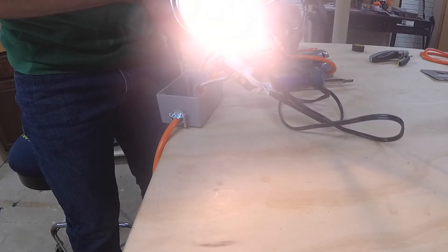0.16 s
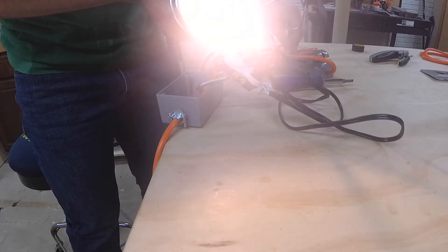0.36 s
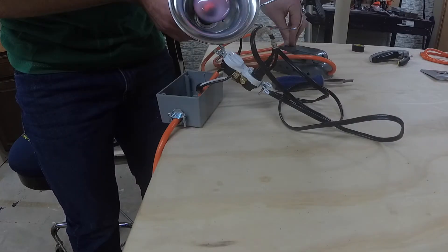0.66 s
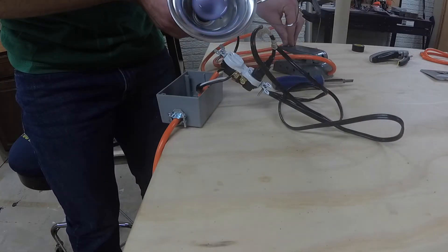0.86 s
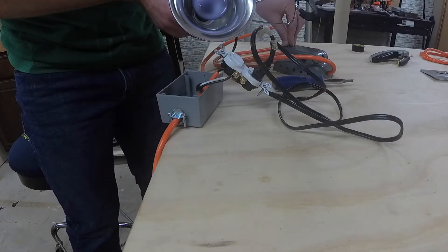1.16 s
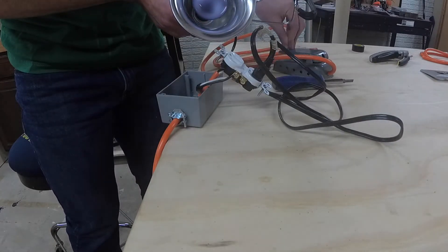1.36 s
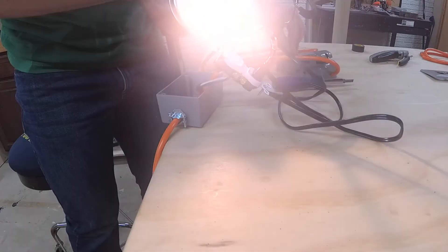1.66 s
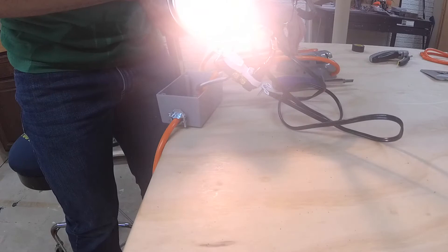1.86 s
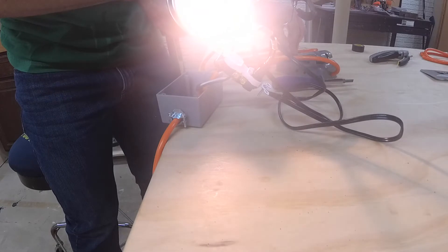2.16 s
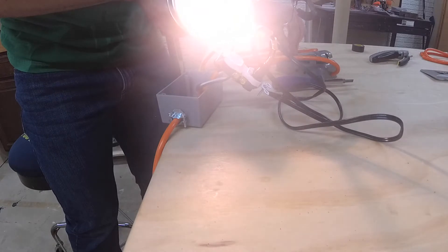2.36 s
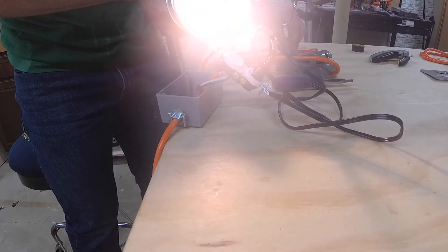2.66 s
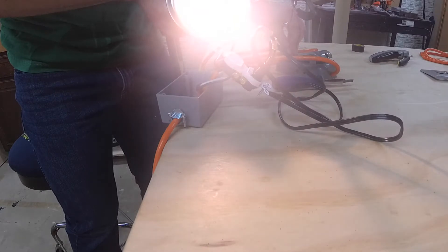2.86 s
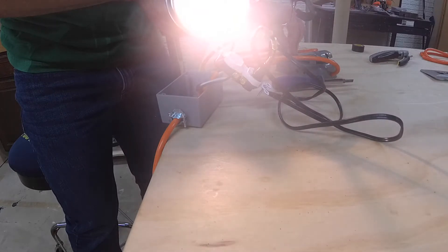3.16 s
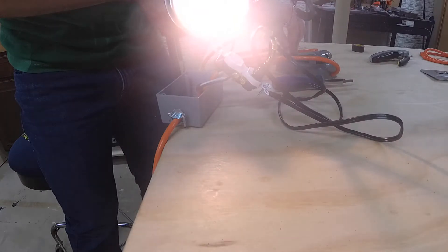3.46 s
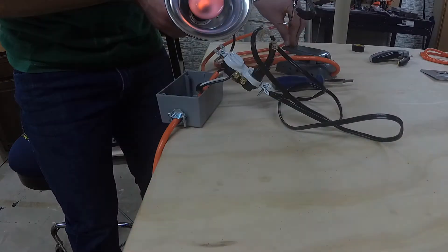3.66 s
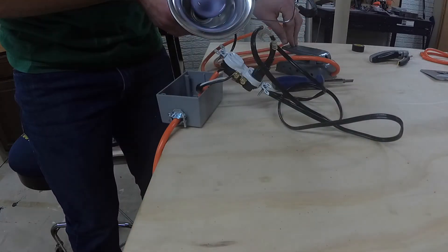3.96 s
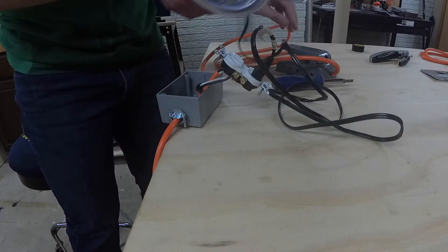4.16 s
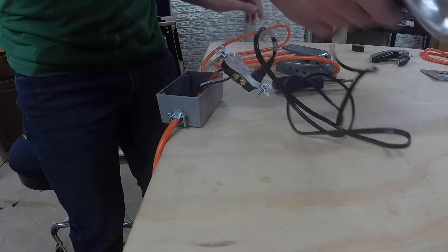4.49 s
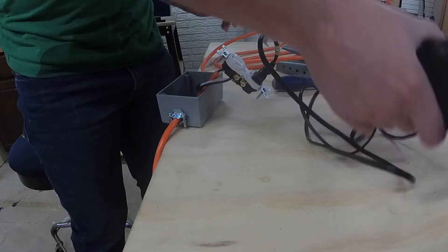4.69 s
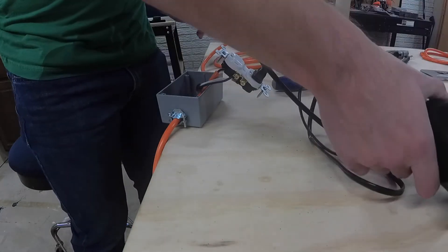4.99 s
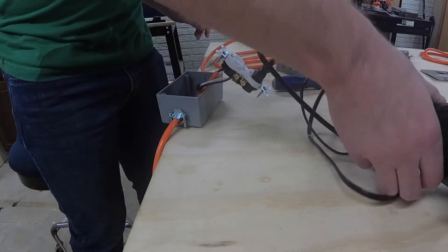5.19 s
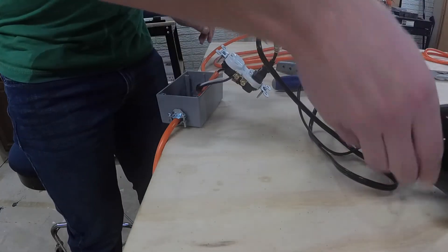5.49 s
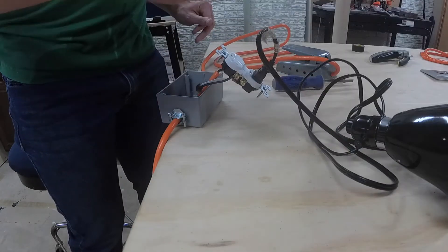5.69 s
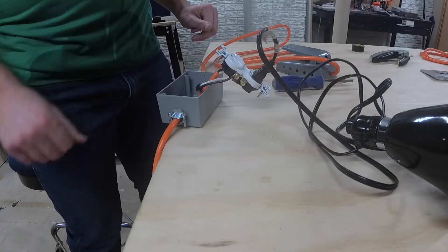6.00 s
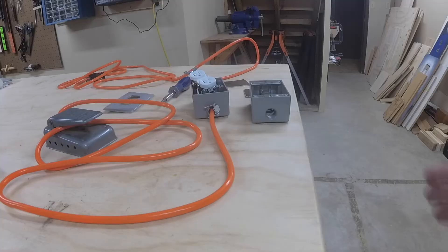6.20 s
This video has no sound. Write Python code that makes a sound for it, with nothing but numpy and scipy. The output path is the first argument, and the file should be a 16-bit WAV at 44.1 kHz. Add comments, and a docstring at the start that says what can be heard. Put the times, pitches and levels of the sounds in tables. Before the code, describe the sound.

Springy clicks and one sharp bang from a steel pedal, followed by a dragged cord and a metal lamp clattering onto plywood.

```python
"""Far-off machines hum in a workshop throughout. At 0.5 s a steel foot switch is released: its hinge
spring slips in small, clicking steps. It is pressed, and at 1.5 s the pedal bangs on its stop; at 3.5 s
it is released again. From 4 s a clamp lamp is unplugged and its cord dragged over a plywood bench.
Around 5 s the lamp is put down and bounces, and the cord rubs on softly to the end."""
import sys
import numpy as np
from scipy import signal
from scipy.fft import rfft, irfft, next_fast_len
from scipy.io import wavfile
from scipy.ndimage import map_coordinates

SR = 44100
rng = np.random.default_rng(int(sys.argv[2]) if len(sys.argv) > 2 else 0)


def file_out(sig):
    """Save sig as 16-bit WAV at sys.argv[1]."""
    # one column per channel
    cols = np.atleast_2d(sig).T
    # limit, then scale
    lim = np.clip(cols, -1, 1)
    pcm = np.round(lim * 32767).astype(np.int16)
    wavfile.write(sys.argv[1], SR, pcm)


N = 279594
SCENE_T = np.arange(N) / SR
HIT_T = np.arange(16000) / SR  # seconds since the start of one hit


def amp(db):
    """Turns decibels into a number to multiply by."""
    return 10 ** (np.asarray(db) / 20)


def unit(x):
    """Scales a sound to an average strength (rms) of 1."""
    return x / np.sqrt(np.mean(x ** 2) + 1e-20)


def along(points, hz):
    """Reads a curve of (f/Hz, value) points at hz, with octaves evenly spaced."""
    freqs, values = np.transpose(points)
    return np.interp(np.log(hz + 1), np.log(freqs + 1), values)


def wobble(rate):
    """A smooth curve through `rate` random values a second."""
    return map_coordinates(rng.standard_normal(int(N * rate / SR) + 4), [SCENE_T * rate])


def filtered(x, response):
    """Multiplies each frequency in x by response(hz)."""
    size = next_fast_len(x.shape[-1] + 4096)
    hz = np.fft.rfftfreq(size, 1 / SR)
    return irfft(rfft(x, size) * response(hz), size)[..., :x.shape[-1]]


def stereo(pair, spectrum, likeness):
    """Shapes two noises and blends them into left and right: likeness 1 is the same, 0 unrelated."""
    def blend(hz):
        angle = np.arccos(np.clip(along(likeness, hz), -1, 1)) / 2
        return amp(along(spectrum, hz)) * [np.cos(angle), np.sin(angle)]
    mid, side = filtered(pair, blend)
    return np.array([mid + side, mid - side])


def ring(tones, rise_s, rough, ring_share=1):
    """A struck body rings at its own tones, each falling 60 dB in its ring time x ring_share; peak 1."""
    hz, db, ring_s = np.transpose(tones)[..., None]
    level = amp(db + 2.5 * rng.standard_normal(hz.shape))  # no two blows are alike
    t = HIT_T[:int(ring_s.max() * ring_share * SR)]
    # small random steps in phase make the tones less pure
    steps = rng.standard_normal((len(hz), len(HIT_T) // 16)) * np.sqrt(rough * hz * 16 / SR)
    wander = np.repeat(np.cumsum(steps, axis=1), 16, axis=1)[:, :len(t)]
    phase = 2 * np.pi * (hz * t + rng.random(hz.shape)) + wander
    fade = amp(-60 * t / (ring_s * ring_share))
    sound = np.sum(level * fade * np.sin(phase), axis=0) * (1 - np.exp(-t / rise_s))
    return np.pad(sound, (0, len(HIT_T) - len(t))) / np.abs(sound).max()


def burst(spectrum, fade_s, rise_s=0.0013):
    """A puff of noise, shaped by (f/Hz, level/dB) points, that falls 60 dB in fade_s; peak 1."""
    noise = filtered(rng.standard_normal(len(HIT_T)), lambda hz: amp(along(spectrum, hz)))
    puff = noise * amp(-60 * HIT_T / fade_s) * (1 - np.exp(-HIT_T / rise_s))
    return puff / np.abs(puff).max()


# The tone colour of the room's air noise: f/Hz, relative level/dB
AIR_COLOUR = [(25, -18.5), (60, -6), (90, -12.5), (120, -7.5), (160, -7.5), (260, -0.5), (330, -7.5),
              (370, -0.5), (410, -11.5), (480, -5), (580, -12), (740, -12.5), (900, -12.5), (1300, -17.5),
              (3000, -19), (8000, -18.5), (15500, -16)]
# How alike that noise is on the left and right: f/Hz, likeness
AIR_LIKENESS = [(60, 0.72), (130, 0.96), (290, 0.98), (640, 0.81), (1410, 0.42), (3100, 0.076),
                (6820, -0.073), (15000, -0.39)]
# The tones of far-off motors: f/Hz, level/dB
MOTOR_TONES = [(60, -65), (120.5, -66), (240, -65), (300, -61.5), (372, -77), (480, -68), (625, -70),
               (660, -71), (732, -69), (802, -84), (1090, -77.5)]

def workshop():
    """Air rushes softly and distant motors hum; the higher tones waver more in pitch."""
    air_level = amp(-51.5 + 0.66 * wobble(9))
    air = air_level * unit(stereo(rng.standard_normal((2, N)), AIR_COLOUR, AIR_LIKENESS))
    hum = np.zeros(N)
    for hz, db in MOTOR_TONES:
        level = amp(db + 3.1 * wobble(7.5))
        hum += level * np.sin(2 * np.pi * hz * SCENE_T + 0.0048 * hz * wobble(11))
    return air + hum


# How long the room's echo takes to fall 60 dB: f/Hz, fade time/s
ECHO_FADE = [(150, 0.6), (500, 0.44), (1500, 0.38), (4000, .3), (8000, 0.25), (15000, 0.18)]
# How alike the echo is on the left and right: f/Hz, likeness
ECHO_LIKENESS = [(60, 0.99), (300, 1), (1000, 0.96), (3000, 0.98), (4500, 0.59), (8000, 0.1), (15000, .2)]

def add_hit(out, start_s, hit, echo_db, pan_db):
    """Adds a hit and its echo from the walls to out; a pan below 0 leans to the right."""
    length = len(HIT_T)
    hz, t, bands = signal.stft(rng.standard_normal((2, length)), SR, nperseg=256)
    fade = amp(-60 * t / along(ECHO_FADE, hz)[:, None])
    tail = signal.istft(bands * fade, SR, nperseg=256)[1][:, :length]
    tail = stereo(tail, [(1, 0)], ECHO_LIKENESS) * np.clip(HIT_T / 0.003, 0, 1)
    echo = signal.fftconvolve(hit[None], unit(tail) / np.sqrt(length), axes=1)[:, :length]
    direct = hit * amp([[pan_db / 2], [-pan_db / 2]])
    heard = direct + amp(echo_db) * echo
    start = round(start_s * SR)
    out[:, start:start + length] += heard[:, :N - start]


# How loudly the cord and its sleeve slide: t/s, rub level/dB, hiss level/dB
CORD_DRAG = [(4.0, -109, -71), (4.2, -71, -57), (4.36, -75, -64), (4.41, -55.5, -59), (4.58, -41.5, -49.5),
             (4.69, -45.5, -50.5), (4.771, -39, -44.5), (4.91, -51.5, -53.5), (4.99, -43, -47),
             (5.3, -47.5, -55.5), (5.45, -48, -45), (5.701, -60.5, -59.5), (5.87, -60.5, -52.5),
             (5.98, -69, -60), (6.18, -59, -54.5), (6.34, -59.5, -60)]
# The tone colours of the rub and the hiss: f/Hz, relative level/dB
RUB_COLOUR = [(180, -49), (300, -19.5), (330, -41.5), (371, -1.5), (700, -2.5), (769, -3), (929, -1),
              (5000, -12), (6500, -47.5), (11000, -120)]
HISS_COLOUR = [(1500, -44), (3000, -3.5), (7000, 2.5), (12000, -2), (16000, -1)]

def cord():
    """Rubber and cloth slide over plywood: a grainy rub in the board, with a finer hiss."""
    grain = amp(1.2 * wobble(40) + 1.3 * wobble(360))
    rub = unit(grain * stereo(rng.standard_normal((2, N)), RUB_COLOUR, ECHO_LIKENESS))
    hiss = unit(grain * stereo(rng.standard_normal((2, N)), HISS_COLOUR, ECHO_LIKENESS))
    times, rub_db, hiss_db = np.transpose(CORD_DRAG)
    return amp(np.interp(SCENE_T, times, rub_db)) * rub + amp(np.interp(SCENE_T, times, hiss_db)) * hiss


# Ticks and scuffs of plug, cord and tools: t/s, level/dB, f/Hz, fade time/s
SMALL_TICKS = [(.452, -40, 1070, 0.12), (0.919, -43.5, 1110, 0.21), (1.212, -48, 1230, 0.14),
               (1.355, -43.5, 1094, 0.077), (4.1425, -23.5, 3770, 0.012), (4.205, -38, 1600, 0.026),
               (4.212, -29.5, 3920, .023), (4.214, -30.5, 1840, 0.021), (4.215, -22, 10200, .012),
               (4.244, -53, 1700, 0.07), (4.305, -42, 3820, .02), (4.458, -36, 1400, 0.029),
               (4.482, -35, 1050, 0.017), (4.489, -30, 7000, 0.0059), (4.964, -37, 1530, 0.1),
               (6.079, -41.5, 1300, 0.14), (6.201, -28, 2090, 0.039)]

def ticks():
    """Small parts touch: a puff of noise around one pitch; the longer it lasts, the softer it starts."""
    out = np.zeros((2, N))
    for start_s, db, hz, fade_s in SMALL_TICKS:
        colour = [(hz / 2, -28), (hz / 1.1, -3), (hz * 1.1, -3), (hz * 1.8, -20), (hz * 5, -32)]
        tick = burst(colour, fade_s, rise_s=0.017 * fade_s)
        add_hit(out, start_s, amp(db) * tick, echo_db=-8, pan_db=-0.3)
    return out


def favoured(tones, hz, fall_db):
    """The spot that is struck brings out the tones near hz: fall_db less for each octave away."""
    return [(f, db - fall_db * abs(np.log2(f / hz)), ring_s) for f, db, ring_s in tones]


# Lamp and cord meet the bench:
# t/s, housing level/dB, board level/dB, rim level/dB, favoured housing f/Hz, favoured rim f/Hz
BENCH_KNOCKS = [(4.085, -31.5, -44, -65, 850, 2340), (4.379, -38, -47, -36.5, 1020, 2300),
                (4.3833, -26, -43, -27, 1060, 2780), (4.7705, -20, -32.5, -21.5, 1290, 2900),
                (4.985, -17.5, -12.5, -22.5, 990, 2290), (4.992, -10.5, -21, -21, 865, 4000),
                (5.0803, -7, -20.5, -17.5, 1050, 3320), (5.093, -34, -28, -14.5, 1300, 2190),
                (5.1254, -10, -25.5, -25, 950, 4540), (5.2111, -17, -42, -14, 1170, 4580),
                (5.251, -25.5, -37.5, -28, 1750, 2250), (5.3599, -11, -31.5, -30, 940, 2320),
                (5.467, -23.5, -61, -46, 1150, 2300), (5.48, -44, -54, -29.5, 1160, 2920),
                (5.494, -37, -60, -31, 1160, 6030)]
# The tones of the lamp's housing, its thin reflector rim and the plywood board:
# f/Hz, relative level/dB, ring time before muffling/s
HOUSING_TONES = [(719.4, -6, 0.21), (790, -3.5, 0.056), (1079, 6.5, 0.025), (1136, -0.5, 0.045),
                 (1385, 1, 0.029), (1775, -9.5, 0.07)]
RIM_TONES = [(2300, -5, .25), (2920, -5, .08), (4060, -4, .07), (4780, 0, .07), (6000, -2, .12),
             (6490, -6, .08), (8300, -10, .05), (10300, -10, .04)]
BOARD_TONES = [(144.2, -11, 0.87), (244, 5, 0.22), (399, 15.5, 0.11), (508.5, 9, 0.33), (579, 6.5, 0.37)]
LET_GO_S = 4.9  # until then the hand muffles the lamp more

def lamp():
    """Each contact knocks the housing, rings the reflector's rim and thumps the plywood."""
    out = np.zeros((2, N))
    for start_s, housing_db, board_db, rim_db, housing_hz, rim_hz in BENCH_KNOCKS:
        share = 0.33 if start_s < LET_GO_S else 0.82
        housing_tones = favoured(HOUSING_TONES, housing_hz, fall_db=13)
        housing = 1.025 * ring(housing_tones, rise_s=0.0011, rough=0.067, ring_share=share)
        housing += 0.4 * burst([(300, -20), (housing_hz, 0), (3000, -20), (9000, -40)], fade_s=0.095)
        rim_tones = favoured(RIM_TONES, rim_hz, fall_db=14)
        rim_colour = [(rim_hz / 4, -20), (rim_hz, 0), (rim_hz * 3.2, -14), (12000, -11), (16000, -9)]
        rim = 0.8 * ring(rim_tones, rise_s=0.0006, rough=0.06, ring_share=share)
        rim += 1.46 * burst(rim_colour, fade_s=0.032)
        board = ring(BOARD_TONES, rise_s=0.0012, rough=0.071, ring_share=0.73)
        knock = amp(housing_db) * housing + amp(board_db) * board + amp(rim_db) * rim
        add_hit(out, start_s, knock, echo_db=-8, pan_db=-0.3)
    return out


# The tones of the foot switch's hinge pin, lowest first: f/Hz, ring time/s
PIN_TONES = [(2295, 0.36), (2526, 0.1), (3830, 0.023), (4190, 0.055), (6280, 0.061)]
# When the pin rings: t/s, level/dB, which tone ("a" is the lowest)
PIN_PINGS = [(.600, -49, "a"), (.66, -31.5, "d"), (.665, -42, "e"), (.809, -53, "a"), (.814, -49, "d"),
             (1.370, -39, "c"), (1.407, -34.5, "c"), (1.444, -31.5, "c"), (1.479, -39.5, "d"),
             (3.728, -42, "b")]

def hinge_pin():
    """The hinge pin pings, with just one of its tones each time."""
    out = np.zeros((2, N))
    for start_s, db, letter in PIN_PINGS:
        hz, ring_s = PIN_TONES["abcde".index(letter)]
        ping = ring([(hz, 0, ring_s)], rise_s=0.001, rough=0.26)
        add_hit(out, start_s, amp(db) * ping, echo_db=-6, pan_db=-0.4)
    return out


# Each stroke of the pedal as it starts:
# t/s, spring f/Hz, spring ring time/s, level of the base's jolt for a 0 dB click/dB
PEDAL_STROKES = [(.46, 1135, 0.062, -26), (1.35, 1087, 0.26, -25.5), (3.54, 1138, 0.099, -27)]
# The small slips of the hinge: t/s, click level/dB, spring level/dB
HINGE_SLIPS = [(0.471, -17, -36.5), (0.5096, -11.5, -21), (0.5445, -8, -25), (.5700, -12, -17),
               (0.586, -13.5, -16.5), (0.588, -7.5, -23), (0.6019, -24, -27), (0.663, -31, -46),
               (1.372, -39, -37.5), (1.386, -36.5, -43), (1.408, -26, -30.5), (1.4455, -19, -22),
               (1.479, -16, -22.5), (1.5003, -9.5, -18), (3.5463, -22, -42), (3.6061, -14, -25),
               (3.6558, -11.5, -27), (3.6886, -16.5, -22.5), (3.7063, -10.5, -13), (3.7123, -11.5, -21),
               (3.7280, -26, -19.5), (3.7350, -31, -39)]
# The tones of the pedal's steel plate and of the cast base: f/Hz, relative level/dB, ring time/s
PLATE_TONES = [(1329, 3.5, 0.067), (2000, -13.5, 0.14), (2453, -13.5, 0.37), (2797, 0.5, 0.039),
               (3813, -2, 0.086), (4290, -3.5, 0.047), (4630, 8.5, 0.034), (5910, -29, .03),
               (6293, 4, 0.02), (7060, 0.5, 0.025), (8210, 2, 0.084), (11160, 1, 0.009),
               (12070, 8.5, 0.0074), (14700, -22, 0.022)]
BASE_TONES = [(192, -16, 0.22), (410, -1.5, 0.055), (488.5, -0.5, 0.15), (709.5, -5.5, 0.11),
              (868.5, -9, 0.17)]
SPRING_CLIMB_HZ_PER_S, JOLT_GROWTH_DB_PER_S = 160, 36.5  # along a stroke: tighter spring, harder jolts
MUFFLE_DB_PER_S = 900  # the next contact stills the spring this fast

def hinge_slips():
    """Each slip clicks the pedal's plate, plucks the spring and jolts the base."""
    out = np.zeros((2, N))
    contacts = np.sort([row[0] for row in HINGE_SLIPS + STOP_HITS] + [N / SR])
    for start_s, click_db, spring_db in HINGE_SLIPS:
        stroke_s, first_hz, ring_s, jolt_db = [row for row in PEDAL_STROKES if row[0] < start_s][-1]
        elapsed_s = start_s - stroke_s
        click = 0.72 * ring(PLATE_TONES, rise_s=0.00014, rough=0.43)
        click += burst([(1000, -13), (3000, -9), (8000, -6), (15000, -1.5)], fade_s=0.012)
        next_contact_s = contacts[contacts > start_s][0]
        muffle = amp(-MUFFLE_DB_PER_S * np.clip(HIT_T + start_s - next_contact_s, 0, 1))
        spring_hz = first_hz + SPRING_CLIMB_HZ_PER_S * elapsed_s
        spring = muffle * ring([(spring_hz, 0, ring_s)], rise_s=0.0015, rough=0.008)
        base_db = jolt_db + 0.49 * click_db + JOLT_GROWTH_DB_PER_S * elapsed_s
        base = ring(BASE_TONES, rise_s=0.0025, rough=0.099)
        add_hit(out, start_s, amp(click_db) * click + amp(base_db) * base, echo_db=-4, pan_db=-0.4)
        add_hit(out, start_s, amp(spring_db) * spring, echo_db=-9, pan_db=-0.4)
    return out


# The pedal meets its stop and rebounds: t/s, level/dB
STOP_HITS = [(1.5152, 1.5), (1.5165, -5)]
# The tones of the switch when pressed shut: f/Hz, relative level/dB, ring time/s
SHUT_TONES = [(60.75, -21.5, 0.29), (208, -1.5, 0.079), (595, -10.5, 0.24), (1245, -12, 0.071),
              (1550, -25, 0.11), (1880, -4, .1), (2037, 4.5, .08), (2370, -5.5, 0.11), (2650, -1.5, 0.08),
              (3060, -5.5, 0.13), (4930, -17, .06), (5020, -15.5, 0.28), (6650, -0.5, 0.11),
              (8200, -12, .1), (9270, -4.5, 0.12)]
# The tone colour of the bang's noise: f/Hz, relative level/dB
BANG_COLOUR = [(40, -32.5), (200, -15), (550, -8), (1340, -1), (2060, 1), (3000, -8.5), (5000, -10),
               (9000, -8), (15500, -7.5)]

def pedal_bang():
    """The pedal hits its stop with a sharp crack, and the whole switch rings."""
    out = np.zeros((2, N))
    for start_s, db in STOP_HITS:
        body = 0.41 * ring(SHUT_TONES, rise_s=0.00015, rough=0.215)
        crack = 0.94 * burst(BANG_COLOUR, fade_s=0.033, rise_s=0.00041)
        add_hit(out, start_s, amp(db) * (body + crack), echo_db=-6, pan_db=-0.6)
    return out


def from_right(sound, lead):
    """A sound from the right reaches that side first, ahead by lead(hz) radians."""
    return filtered(sound, lambda hz: np.exp(np.outer([-0.5j, 0.5j], lead(hz))))


# How far the switch's sound on the right runs ahead of the left: f/Hz, lead/radians
SWITCH_RIGHT_LEAD = [(4000, 0.11), (8000, 0.67), (12000, 1.1), (15000, 1.7)]
BENCH_LAG_S = 0.000043  # bench sounds reach the left this much later

def scene():
    """The switch and the bench are close by on the right, with the workshop's hum behind them."""
    switch = from_right(hinge_slips() + hinge_pin() + pedal_bang(), lambda hz: along(SWITCH_RIGHT_LEAD, hz))
    bench = from_right(lamp() + ticks() + cord(), lambda hz: 2 * np.pi * hz * BENCH_LAG_S)
    return workshop() + bench + switch


def record(dry):
    """Thins the bass below 120 Hz, rounds off the loudest peaks and cuts the treble above 15400 Hz."""
    thin = signal.sosfilt(signal.butter(2, 120, "high", fs=SR, output="sos"), dry)
    rounded = thin / (1 + np.abs(thin / 0.93) ** 8) ** (1 / 8)
    return filtered(rounded, lambda hz: 1 / (1 + (hz / 15400) ** 400))


dry = scene()
out = record(dry)
file_out(out)
```